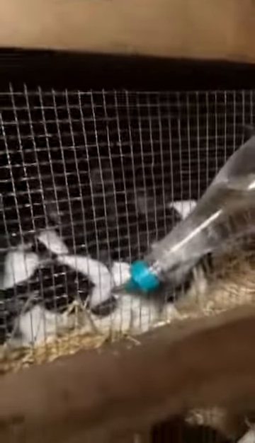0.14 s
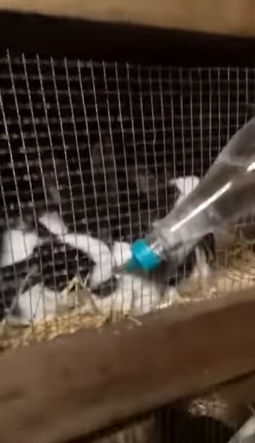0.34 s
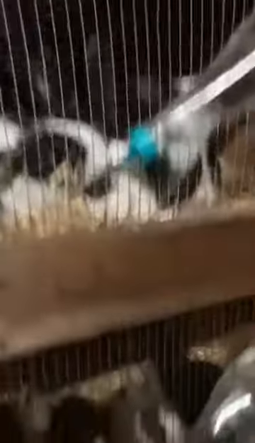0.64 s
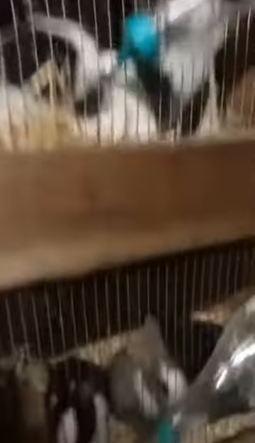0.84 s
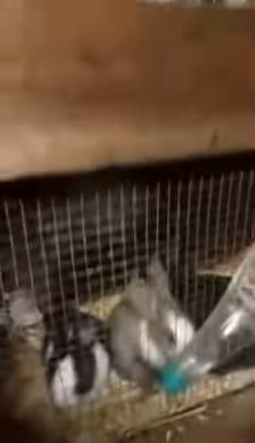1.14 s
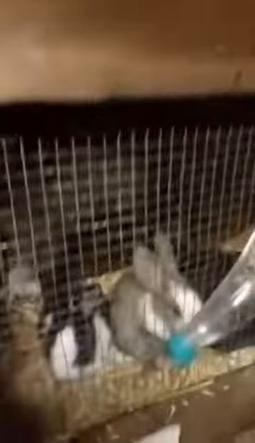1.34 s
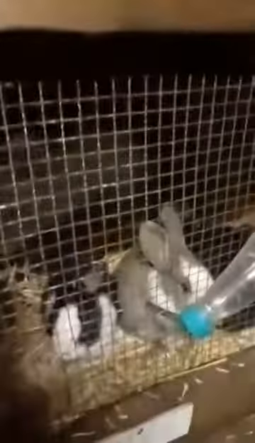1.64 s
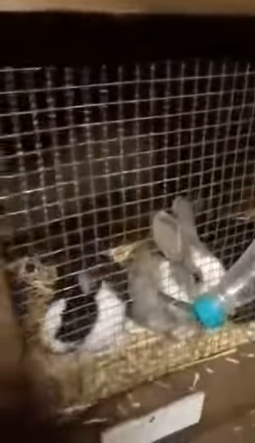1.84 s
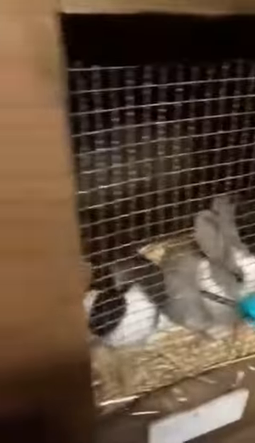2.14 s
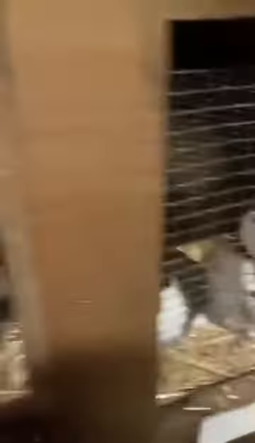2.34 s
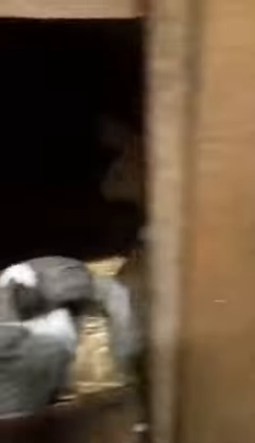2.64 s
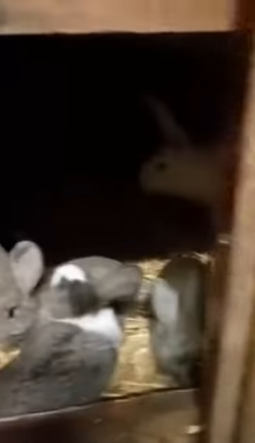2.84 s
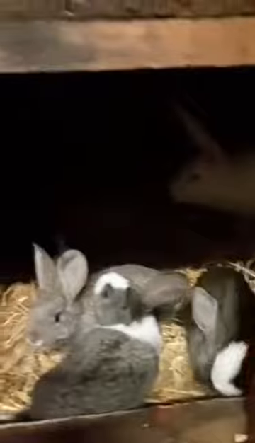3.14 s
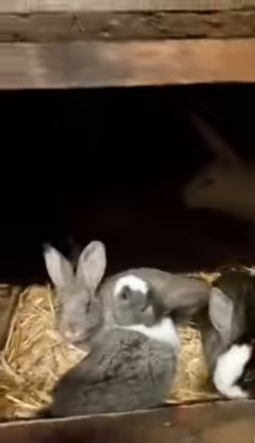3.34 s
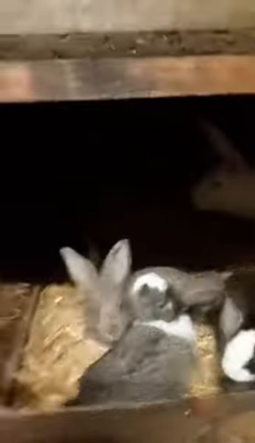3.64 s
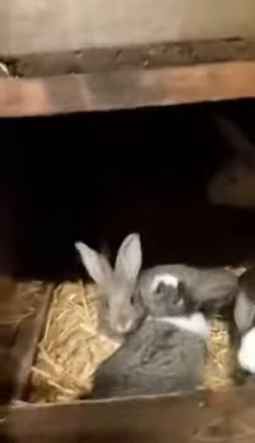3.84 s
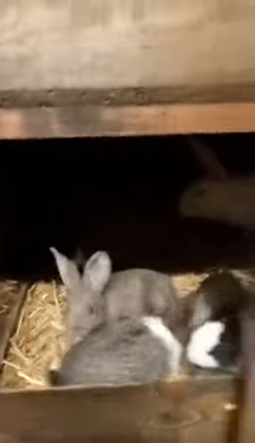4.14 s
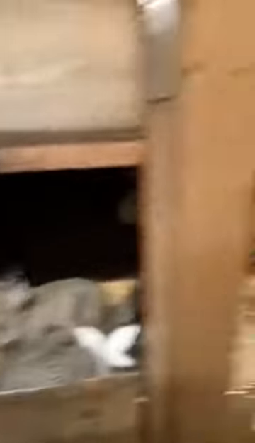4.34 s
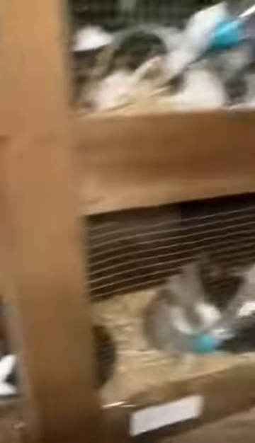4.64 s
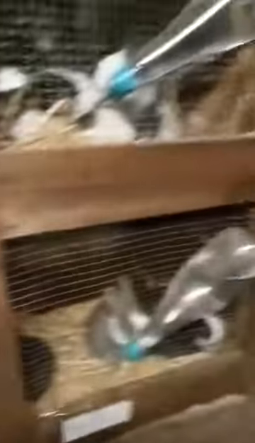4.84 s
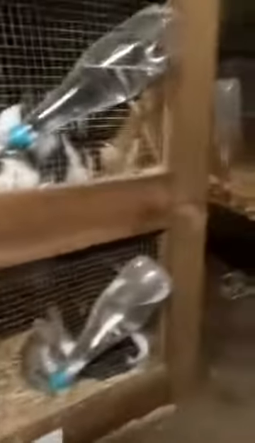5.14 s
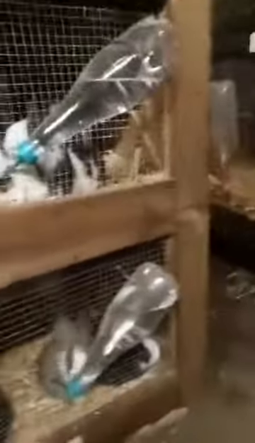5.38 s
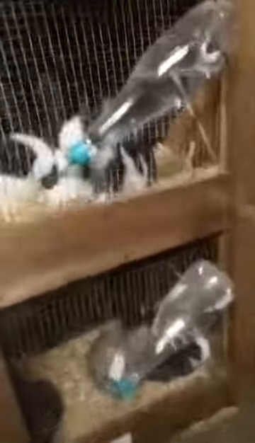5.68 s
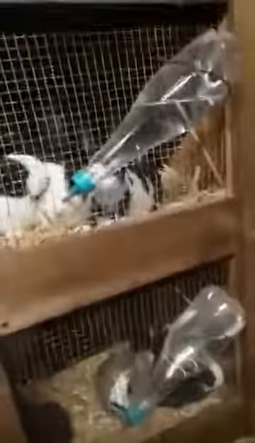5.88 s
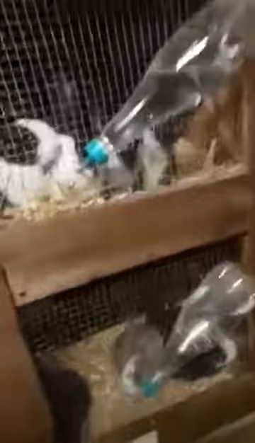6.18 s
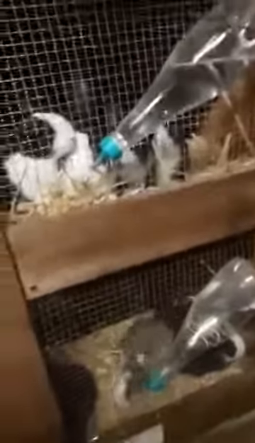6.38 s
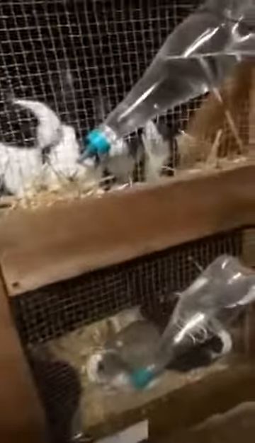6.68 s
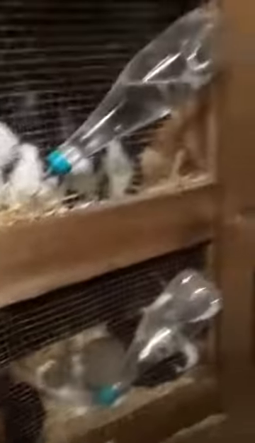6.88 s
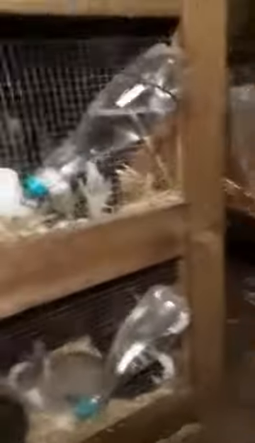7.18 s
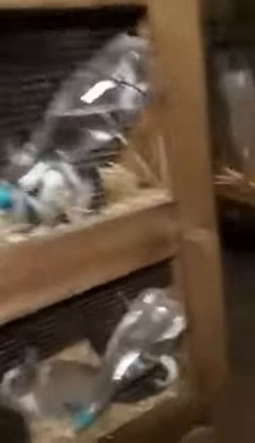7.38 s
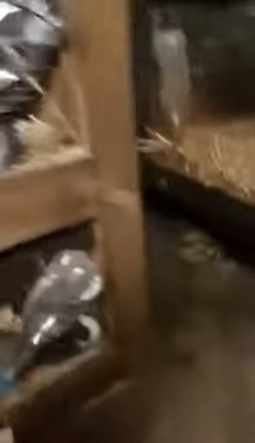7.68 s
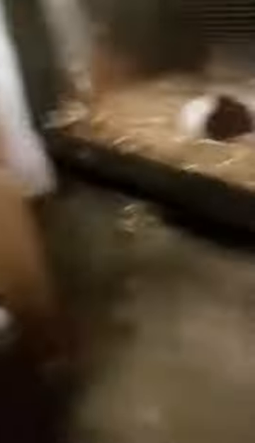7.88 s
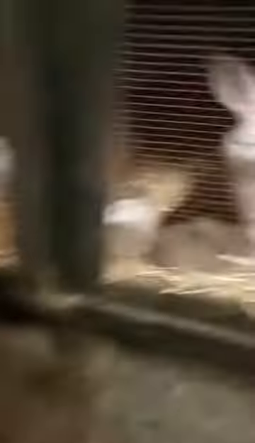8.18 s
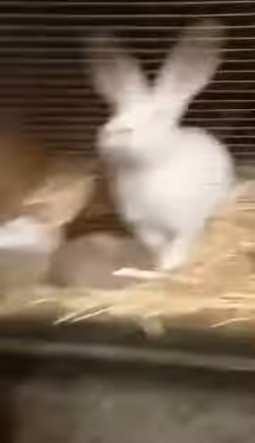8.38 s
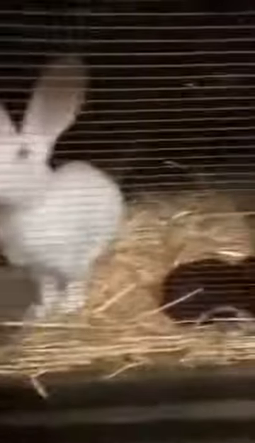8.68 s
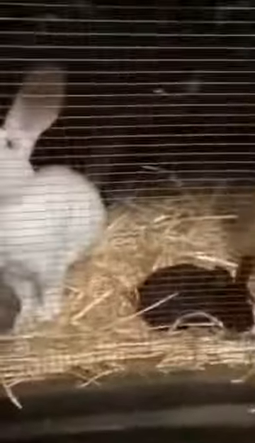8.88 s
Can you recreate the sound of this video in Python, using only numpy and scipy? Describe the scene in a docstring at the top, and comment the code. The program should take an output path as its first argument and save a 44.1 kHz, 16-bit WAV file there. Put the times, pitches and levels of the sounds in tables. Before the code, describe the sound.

Steady metallic lapping at drinker valves and soft straw rustles, broken midway by a burst of sharp hutch clacks and hollow floor thumps.

```python
"""Rabbits drinking in a shed

Rabbits lick and nibble at the ball valves of their bottles, about four times a second, and scrabble briefly:
noise bursts excite spout resonances. Straw hisses, crackles and swishes; scuffed boards resonate and glide.
Midway one bolts: blows excite the damped modes of the wooden frame, and feet those of the hollow floor.
Fingers tap the camera's case in short damped swings; faint whines and steady noise lie behind."""
import sys
import numpy as np
from scipy import signal
from scipy.fft import rfft, irfft
from scipy.io import wavfile
from scipy.ndimage import uniform_filter1d

SR = 44100
rng = np.random.default_rng(int(sys.argv[2]) if len(sys.argv) > 2 else 0)


def put_to_file(sound):
    """Save the sound as 16-bit audio at rate SR, in the file named by the first command-line argument."""
    columns = np.atleast_2d(sound).T  # one column per channel
    safe = np.clip(columns, -1, 1)
    whole_steps = np.round(safe * 32767)
    wavfile.write(sys.argv[1], SR, whole_steps.astype(np.int16))


N = 397782
TIME = np.arange(N) / SR

# Event levels are relative: most sources add a trim of their own; the whines use theirs directly.
# Wet licks and nibbles at the ball valves, and a few scrabbling bursts from 5.4 to 6.7 s:
# (time [s], peak level [dB], lead of the softer first burst [s], lag of the softer last burst [s])
LICKS_AND_SCRABBLES = [(0.001, -51, .04, 0.03), (0.202, -44, 0.045, 0.1), (0.465, -41.5, 0.083, 0.081),
                       (0.708, -42.5, 0.05, 0.064), (0.945, -42.5, 0.044, 0.024),
                       (1.025, -46, 0.013, 0.016), (1.195, -47, 0.04, 0.022), (1.341, -51.5, 0.033, 0.012),
                       (1.431, -41, 0.034, .108), (1.687, -40, 0.053, 0.046), (2.03, -42, 0.042, 0.12),
                       (2.278, -42.5, 0.035, 0.063), (2.543, -42, 0.045, 0.052), (2.787, -39, 0.047, 0.08),
                       (3.043, -44, 0.06, 0.073), (3.284, -42.5, 0.045, 0.028), (3.518, -39, 0.18, .121),
                       (3.756, -40, 0.034, 0.13), (3.984, -43, 0.049, 0.11), (4.232, -41, 0.038, 0.095),
                       (4.497, -42, .049, 0.067), (4.766, -39, 0.028, 0.073), (5.079, -42, 0.034, 0.018),
                       (5.421, -40, 0.052, .04), (6.174, -39, 0.014, .037), (6.441, -34.5, 0.075, .14),
                       (6.697, -39.5, 0.008, 0.14), (6.976, -42.5, 0.029, 0.081),
                       (7.228, -43.5, 0.061, 0.094), (7.48, -42, 0.047, 0.04), (7.805, -45, 0.035, 0.033),
                       (8.106, -39, 0.011, 0.032), (8.359, -42.5, .04, 0.11), (8.625, -43, 0.053, 0.15),
                       (8.815, -44, .04, .126)]
# Spectrum of bodies brushing on bedding and boards: (frequency [Hz], density [dB per Hz])
BRUSH_SPECTRUM = [(80, -3.5), (200, 4.5), (330, 1.5), (600, -2), (1000, -11.5), (2000, -12.5),
                  (5000, -42.5)]
# Bass roll-off of the microphone: (frequency [Hz], gain [dB])
BASS_ROLL_OFF = [(15, -62), (40, -19.5), (55, -11), (68, 1.5)]


def laps(level_db=-1, room_db=-3, grain_db=1, rise_s=0.0056, fade_s=0.0097, variety_db=3, uneven=0.8):
    """Source and resonator: a lick sets the steel ball chattering in its spout; scrabbles share the same bursts."""
    # Spectrum of the chatter: (frequency [Hz], density [dB per Hz])
    chatter_spectrum = [(180, -48), (300, -14), (715, -1.5), (940, 1), (1680, -6.5), (1880, -3.5),
                        (2170, -7.5), (3350, -1.5), (3870, -7.5), (5250, -28.5), (8780, -25.5),
                        (11000, -21), (12700, -21), (13300, -41.5), (14000, -87.5)]
    # Ringing of the steel spouts: (frequency [Hz], width [Hz], level [dB], pitch spread between bursts [share])
    spout_modes = [(1060, 123, -13.5, 0.064), (3510, 270, -11.5, 0.086), (11170, 800, -19, 0.008)]
    out, t = np.zeros(N), np.arange(SR // 8) / SR
    hz, db_per_hz = np.transpose(chatter_spectrum)
    for s, db in contacts():
        rise = rise_s * np.exp(uneven * rng.standard_normal())  # some bursts snap, others build up
        shape = np.minimum(t / rise, 1) * np.exp(-np.maximum(t - rise, 0) / fade_s)
        grain = np.repeat(rng.standard_normal(len(t)), 40)[:len(t)]  # steps of 40 samples
        chatter = rng.standard_normal(len(t)) * amp(grain_db * grain)
        varied = db_per_hz + variety_db * rng.standard_normal(len(hz))
        burst = unit(colour(chatter, np.c_[hz, varied]))
        for pitch, width, ring_db, spread in spout_modes:
            pitch = pitch * (1 + spread * rng.standard_normal())
            ringing = resonate(resonate(chatter, pitch, width), pitch, 2 * width)
            burst = burst + amp(ring_db) * unit(ringing)
        burst = burst * shape
        add(out, s, amp(db + level_db) * burst / peak_of(burst, size=300))
    return out + amp(room_db) * shed(out)  # far off, so the shed rings with it


def contacts(first_db=-6, last_db=-8.5):
    """Successive impacts: a lick touches the ball, pushes it in and lets it drop back; scrabbles get three bursts too."""
    hits = []
    for s, db, lead, lag in LICKS_AND_SCRABBLES:
        hits += [(s - lead, db + first_db), (s, db), (s + lag, db + last_db)]
    return [hit for hit in hits if hit[0] >= 0]


def clacks(level_db=-3, ring_db=-4, room_db=-13, low_db=12, high_db=18, spread=0.015, rise_s=0.0012):
    """Modal excitation: a short rattling burst drives the frame's modes; each event balances wood and wire its own way."""
    # Hard knocks on the hutch frame, and two faint ticks of licking at 5.08 and 7.48 s:
    # (time [s], peak level [dB], relative low-mid [dB], relative treble [dB], rattle time [s])
    knocks_and_ticks = [(4.7112, -37, 2.5, -24, 0.0068), (4.9594, -36.5, 2, -26, 0.0044),
                        (4.9657, -12.5, -19, -19, 0.002), (5.0802, -36.5, -24, -26, 0.003),
                        (5.27, -41, 8.5, -10, 0.012), (5.3068, -10, -11, -23.5, 0.0052),
                        (5.4008, -30.5, 7, -7, 0.0081), (5.4949, -19.5, -7.5, -30, 0.0027),
                        (5.5816, -18, 3.5, -9.5, 0.0032), (5.5933, -24, -1, -36, 0.0034),
                        (5.613, -20, -15, -7, 0.0018), (5.631, -18.5, -11, -14, 0.008),
                        (5.6656, -28, 0, -8, 0.005), (5.6843, -31.5, -2, -12, 0.0064),
                        (5.7433, -36.5, -2, -41, 0.003), (5.7826, -22.5, -12.5, -14, 0.0046),
                        (6.0635, -18, -10, -12.5, 0.0041), (6.2611, -42.5, 11.5, 3.5, 0.0078),
                        (6.3211, -36.5, 3.5, -22, 0.016), (6.4797, -20.5, -3.5, -6, 0.0026),
                        (6.7317, -9, -10, -12.5, 0.0033), (7.1602, -37, 4, -13, 0.0029),
                        (7.4787, -39, -25, -33, 0.0023)]
    # Modes of the frame: (frequency [Hz], level [dB], t60 [s])
    frame_modes = [(512, -15, 0.15), (625, -17, 0.14), (1084, -22.5, 0.11), (1252, -12, 0.072),
                   (2115, -5, 0.058), (2397, 5.5, 0.015), (2487, -0.5, 0.019), (2873, 0.5, 0.029),
                   (3250, -14, .02), (3280, -6, 0.063)]
    # Spectrum of the crack: (frequency [Hz], density [dB per Hz])
    crack_spectrum = [(150, -50), (500, -4.5), (900, -11.5), (1300, 1), (2300, 1), (3600, 2), (4200, -6.5),
                      (5000, -28.5), (6500, -23), (8500, -34), (13000, -33.5)]
    out, t = np.zeros(N), np.arange(SR // 5) / SR
    for s, db, low, high, rattle in knocks_and_ticks:
        burst = rng.standard_normal(len(t)) * (1 - np.exp(-t / rise_s)) * np.exp(-t / rattle)
        crack = colour(burst, crack_spectrum)
        # Every mode is detuned a little from event to event.
        frame = sum(ring([mode], t, 1 + spread * rng.standard_normal()) for mode in frame_modes)
        wood = signal.fftconvolve(burst, frame)[:len(t)]
        clack = crack / peak_of(crack) + amp(ring_db) * wood / peak_of(wood)
        balance = [(1200, low + low_db), (2350, 0.0049), (4600, 0), (6000, high + high_db)]
        add(out, s, amp(db + level_db) * colour(clack / peak_of(clack, size=200), balance))
    return colour(out + amp(room_db) * shed(out), BASS_ROLL_OFF, size=8192)


def thumps(level_db=-2, judder_db=-15, judder_s=0.024, room_db=-14, build_s=0.0032):
    """Soft impact on a plate: a padded foot excites the floor's low modes, and loose boards judder after it."""
    # Feet landing on the hollow floor:
    # (time [s], peak level [dB], contact time [s], pitch factor of the spot, ring time factor)
    landings = [(4.728, -34, 0.0084, 0.76, 0.41), (5.063, -31, 0.0023, 1.03, 0.67),
                (5.581, 1, 0.0023, 0.94, 0.69), (5.593, -8.5, 0.002, 0.92, 0.94),
                (5.699, -16.5, 0.0048, 0.98, 1), (5.827, -31, 0.0029, 0.93, 1),
                (6.065, -36, 0.0018, 0.92, 1), (6.483, -18, 0.00096, 0.74, 0.78),
                (6.506, -22.5, 0.0072, 1.04, 1), (6.731, -19, 0.0081, 1.08, 0.75),
                (6.856, -21.5, 0.004, 1.05, 0.71), (7.113, -32.5, 0.0052, 0.72, 1),
                (7.161, -13, 0.0048, 0.89, 0.81), (8.119, -32, 0.015, 0.95, 0.93),
                (8.53, -33, 0.0033, 0.84, 0.27)]
    # Modes of the floor before these factors: (frequency [Hz], level [dB], t60 [s])
    floor_modes = [(74.1, -13.5, 0.47), (117.8, -4.5, 0.32), (163.9, 2.5, 0.17), (190.8, -8, 0.33),
                   (246, -18.5, 0.4), (306, -7.5, 0.28), (355.4, -9.5, 0.25), (453, -11, 0.15),
                   (568, -8.5, 0.17), (702, -7, 0.28)]
    out, t = np.zeros(N), np.arange(SR) / SR
    for s, db, contact, pitch, hold in landings:
        push = t * np.exp(-4 * t / contact)
        modes = np.array(floor_modes) * [pitch, 1, hold]
        boom = signal.fftconvolve(ring(modes, t), push)[:len(t)]
        judder = unit(colour(rng.standard_normal(len(t)), BRUSH_SPECTRUM)) * np.exp(-t / judder_s)
        spreading = 1 - np.exp(-t / build_s)  # the whole floor takes a moment to move
        thump = boom / peak_of(boom, size=300) + amp(judder_db) * judder
        add(out, s, amp(db + level_db) * spreading * thump)
    return colour(out + amp(room_db) * shed(out), BASS_ROLL_OFF, size=8192)


def taps(level_db=-1, knock_db=1, click_db=5, cycles=0.42, lag_s=0.0012, click_s=0.00058,
         case_hz=1250, case_t60=0.00067, echo_db=-13):
    """Heavily damped oscillation: a tick, a brief knock and one swing of the case, reflected by the hutch fronts."""
    # Fingers on the camera's case: (time before the common lag [s], peak level [dB], pitch [Hz],
    # relative hardness of the touch [dB], brightness of its tick [dB])
    touches = [(3.395, -33, 320, -24, -8), (3.406, -27.5, 646, -8.5, -7), (3.445, -32.5, 328, -40, 0),
               (3.519, -34, 332, -20, -12), (3.591, -27.5, 332, -8, -6), (3.6081, -18.5, 350, -3.5, -10),
               (4.056, -40.5, 298, -32, -4), (4.737, -34, 273, -18, -6), (8.052, -20, 366, 1, -3.5),
               (8.133, -34, 245, -14, 16), (8.337, -24.5, 330, 5.5, -3), (8.435, -35, 280, -30, 0),
               (8.535, -37, 275, -23, -27), (8.756, -36.5, 456, -17, 12), (8.770, -35.5, 290, -10, 2),
               (8.88, -32.5, 290, -4, -29)]
    # Spectrum of the tick: (frequency [Hz], density [dB per Hz])
    tick_spectrum = [(300, -18), (900, 2), (2200, -8), (3500, -6), (5200, -30), (7000, -10), (9000, -27),
                     (11000, -13), (14000, -47)]
    out, t = np.zeros(N), np.arange(SR // 20) / SR
    for s, db, hz, hard, bright in touches:
        swing = np.sin(2 * np.pi * hz * t) * np.exp(-hz * t / cycles) * (1 - np.exp(-2 * hz * t))
        case = ring([(case_hz, hard + knock_db, case_t60)], t)
        scrape = 0.47 * rng.standard_normal(len(t)) * np.exp(-t / click_s)
        tick = colour((t == 0) + scrape, tick_spectrum)
        tick = colour(tick / peak_of(tick, size=44), [(4000, 0), (9000, bright)])  # nail is brighter than skin
        tap = swing / peak_of(swing) - 2 * case - amp(hard + click_db) * tick
        add(out, s + lag_s, amp(db + level_db) * tap)
    echoes = nearby(out, delay_s=0.0035, span_s=0.009)
    return colour(out + amp(echo_db) * echoes, BASS_ROLL_OFF, size=8192)


def straw(gain, level_db=4, flutter_db=2, swish_db=-7):
    """Friction noise: slow stirring of the bedding, with brighter swishes where a rabbit pushes through."""
    # Quick swishes through the straw: (time [s], peak level [dB], length [s])
    swishes = [(3.897, -43, 0.028), (4.228, -45.5, 0.077), (5.856, -36, 0.031), (5.934, -34, 0.091),
               (6.148, -39, 0.1), (6.349, -30.5, 0.057), (7.081, -40.5, 0.046), (7.112, -37.5, 0.073),
               (7.687, -45, 0.14), (8.09, -45, 0.11), (8.463, -36, 0.15), (8.959, -35.5, 0.075)]
    # Spectra of slow stirring and of swishes: (frequency [Hz], density [dB per Hz])
    stir_spectrum = [(200, -14), (600, 12), (1100, 13.5), (2200, 10.5), (3600, 17.5), (4900, 0.5),
                     (6800, 9), (9000, 0.5), (12500, 6), (14000, -39)]
    swish_spectrum = [(500, -3), (1500, 6.5), (3600, 12), (4900, -0.5), (6800, 6), (9000, 1.5),
                      (12500, 5.5), (14000, 1)]
    flutter = unit(uniform_filter1d(rng.standard_normal(N), 1200))
    pushing = np.zeros(N)
    for s, db, length in swishes:
        add(pushing, s, amp(db + swish_db) * np.hanning(int(length * SR)))
    stirred = stalks(stir_spectrum) * gain * amp(level_db + flutter_db * flutter)
    return stirred + stalks(swish_spectrum) * pushing


def stalks(points, crackle_db=-4, snaps_per_s=600, size_db=3, breaks_per_s=16, break_db=24, break_spread_db=3):
    """Random impulses in noise: stalks hiss and snap in tiny grains; now and then one breaks with a crisp tick."""
    sizes = amp(size_db * np.minimum(rng.exponential(1, N), 5))
    snaps = (rng.random(N) < snaps_per_s / SR) * rng.choice([-1, 1], N) * sizes
    breaks = (rng.random(N) < breaks_per_s / SR) * amp(break_db + break_spread_db * rng.standard_normal(N))
    hiss = rng.standard_normal(N)
    return unit(colour(hiss + amp(crackle_db) * unit(snaps) + breaks, points))


def stirring(attack_s=0.033, release_s=0.028, jostle_db=-26.5, jostle_s=0.085):
    """Addition of powers: bouts of straw, brushing and rumble swell, hold and die away over a resting level."""
    # Bouts of moving about: (start [s], length [s], straw level [dB], brushing level [dB], rumble level [dB])
    bouts = [(0.917, 0.72, -70, -63.5, -66.5), (2.0, 0.98, -76, -65, -64), (3.23, 0.86, -71.5, -57, -62.5),
             (4.177, 1.5, -68, -62, -66), (5.21, 0.3, -63.5, -58, -46.5),
             (5.598, 0.33, -60.5, -53.5, -40.5), (5.874, 0.6, -57, -48.5, -51),
             (6.494, 0.95, -65.5, -69, -60.5), (7.467, .42, -62, -61, -70), (8.037, 1.1, -53.5, -60.5, -67)]
    # While the rabbits sit still: (straw level [dB], brushing level [dB], rumble level [dB])
    rest_levels = (-76.5, -67, -71.5)
    power = amp(rest_levels)[:, None] ** 2 * np.ones(N)
    for start, length, *levels in bouts:
        swell = np.clip((TIME - start) / attack_s, 0, 1)
        release = np.exp(-np.maximum(TIME - start - length, 0) / release_s)
        power = power + (amp(levels)[:, None] * swell * release) ** 2
    for s, db, _, _ in LICKS_AND_SCRABBLES:  # each stroke or scrabble stirs the straw
        power[0] += amp(db + jostle_db) ** 2 * np.exp(-((TIME - s) / jostle_s) ** 2)
    return np.sqrt(power)


def shuffle(brush, rumble, brush_db=-2, rumble_db=-1):
    """Shaped noise under an envelope: shifting weight brushes the bedding and rumbles in the boards."""
    # Spectrum of the boards: (frequency [Hz], density [dB per Hz])
    rumble_spectrum = [(20, -28), (45, -21), (62, -5), (72, 8.5), (86, 3), (115, 3.5), (170, -5.5),
                       (300, -10.5), (800, -65)]
    brushing = unit(colour(rng.standard_normal(N), BRUSH_SPECTRUM)) * brush * amp(brush_db)
    boards = unit(colour(rng.standard_normal(N), rumble_spectrum, size=8192)) * rumble * amp(rumble_db)
    return brushing + boards


def scuffs(level_db=-5, width_hz=55, sag=0.16, upper=2.04, upper_db=-5, rub_db=-7):
    """Friction-driven resonance: fur and feet rub a board, whose two resonances sag as the weight shifts."""
    # Bodies scuffing along the boards: (time [s], level [dB], length [s], mid-glide resonance [Hz])
    rubs = [(0.992, -47, 0.068, 400), (1.296, -44.5, 0.1, 356), (1.622, -43, 0.084, 354),
            (1.704, -45, 0.088, 482), (1.968, -48.5, 0.096, 370), (2.05, -47.5, 0.1, 400),
            (2.581, -47, 0.093, 305), (2.712, -47, 0.15, 368), (2.822, -44, 0.1, 320),
            (3.772, -39, 0.092, 310), (3.88, -43, 0.081, 332), (6.209, -32.5, 0.031, 495),
            (6.714, -31.5, 0.026, 576), (7.158, -29.5, 0.026, 537)]
    out = np.zeros(N)
    for s, db, length, hz in rubs:
        u = np.linspace(0, 1, int(length * SR))
        rub = colour(rng.standard_normal(SR)[:len(u)], BRUSH_SPECTRUM)
        glide = hz * (1 + sag * (0.5 - u))
        lower_tone = unit(resonate(rub, glide, width_hz))
        upper_tone = unit(resonate(np.gradient(rub), upper * glide, width_hz))
        scuff = unit(lower_tone + amp(upper_db) * upper_tone + amp(rub_db) * unit(rub))
        add(out, s, amp(db + level_db) * scuff * np.sin(np.pi * u))
    return out


def whines(width_hz=110, waver=0.031, flicker_db=3):
    """Narrow-band noise: faint breathy tones that glide, waver and flicker."""
    # Thin whines that come and go: (time [s], length [s], level [dB], start [Hz], end [Hz])
    glides = [(0.296, 0.02, -59, 5850, 5800), (1.757, 0.15, -64, 1420, 1360), (4.82, 0.16, -59, 1530, 1450),
              (7.195, 0.13, -51.5, 1590, 1500), (7.292, 0.24, -56.5, 1590, 1360),
              (8.15, 0.12, -60, 1380, 1440)]
    out = np.zeros(N)
    for s, length, db, start, end in glides:
        size = int(length * SR)
        drift, flicker = uniform_filter1d(rng.standard_normal((2, SR)), 900)[:, :size]
        hz = np.linspace(start, end, size) * (1 + waver * unit(drift))
        breath = rng.standard_normal(SR)[:size]
        tone = resonate(resonate(breath, hz, width_hz), hz, 2 * width_hz)
        tone = unit(tone * amp(flicker_db * unit(flicker)))
        add(out, s, amp(db) * tone * signal.windows.tukey(size, 0.6))
    return out


def air(level_db=-64):
    """Stationary coloured noise: the still background of the shed."""
    # Spectrum of the background: (frequency [Hz], density [dB per Hz])
    air_spectrum = [(15, -45.5), (25, 1), (147, 6), (1360, 9.5), (1600, 6.5), (2140, 4.5), (2380, 7.5),
                    (5260, -13.5), (6500, -25.5), (10700, -58), (11900, -27.5), (14000, -8)]
    return amp(level_db) * unit(colour(rng.standard_normal(N), air_spectrum, size=8192))


def shed(x):
    """Exponential reverberation: three sparse tails take turns, the treble dying first."""
    # Reverberation time of the shed: (frequency [Hz], t60 [s])
    decay_times = [(100, 0.44), (500, 0.3), (1100, 0.2), (3000, 0.15), (7000, 0.1), (13000, 0.12)]
    out = np.zeros(N)
    for k in range(3):
        echoes = rng.choice([-1., 1.], SR // 2) * (rng.random(SR // 2) < 0.15)
        hz, t, z = signal.stft(echoes, SR, nperseg=256)
        decay = np.exp(-np.log(1000) * t / read(decay_times, hz)[:, None])
        tail = signal.istft(z * decay, SR, nperseg=256)[1]
        tail *= np.minimum(np.arange(len(tail)) / SR / 0.014, 1)  # builds up over 14 ms
        turn = np.cos(np.pi * (TIME + k / 3)) * np.sqrt(2 / 3)  # the three powers sum to 1
        out += signal.oaconvolve(x * turn, tail / np.linalg.norm(tail))[:N]
    return out


def nearby(x, delay_s, span_s):
    """Early reflections: a short cluster of dull echoes from the hutch fronts."""
    # Spectrum of the hutch fronts near the camera: (frequency [Hz], gain [dB])
    echo_spectrum = [(150, -13), (500, -1), (1000, -2), (3000, -6), (6000, -18)]
    t = np.arange(SR // 20) / SR - delay_s
    cluster = colour(rng.standard_normal(len(t)) * (t > 0) * np.exp(-abs(t) / span_s), echo_spectrum)
    band = abs(rfft(cluster, SR)[300:1200])  # one bin per Hz
    return signal.oaconvolve(x, cluster / np.sqrt(np.mean(band ** 2)))[:N]


def ring(modes, t, pitch=1):
    """Modal superposition: damped sines after one blow."""
    return sum(amp(db) * np.exp(-np.log(1000) * t / t60) * np.sin(2 * np.pi * hz * pitch * t)
               for hz, db, t60 in modes)


def resonate(x, hz, width):
    """Heterodyne resonator: shifts the curve hz to zero, smooths with unit gain and shifts back."""
    turn = np.exp(2j * np.pi * np.cumsum(hz * np.ones(len(x))) / SR)
    r = np.exp(-np.pi * width / SR)
    return 2 * (turn * signal.lfilter([1 - r], [1, -r], x / turn)).real


def colour(x, points, size=2048):
    """Minimum-phase filtering: the log gain fixes the phase of a causal filter."""
    log_gain = np.log(amp(read(points, abs(np.fft.fftfreq(size, 1 / SR)))))
    response = np.fft.ifft(np.exp(np.conj(signal.hilbert(log_gain)))).real
    return signal.oaconvolve(x, response[:size // 2])[:len(x)]


def read(points, hz):
    """Interpolation on a log-frequency axis."""
    f, value = np.transpose(points)
    return np.interp(np.log(hz + 1), np.log(f), value)


def amp(db):
    """Logarithmic level: decibels to amplitude gain."""
    return 10 ** (np.asarray(db) / 20)


def unit(x):
    """Power normalisation: scales to rms 1."""
    return x / np.sqrt(np.mean(x ** 2) + 1e-20)


def peak_of(x, size=88):
    """Running power average: the highest short-time rms over size samples."""
    return np.sqrt(uniform_filter1d(x ** 2, size).max())


def add(mix, s, sound):
    """Superposition: lays a sound into the mix at s seconds."""
    part = mix[max(round(s * SR), 0):][:len(sound)]
    part += sound[:len(part)]


def scene(knock_side_db=-5):
    """Mid-side stereo: independent draws of some sources form a side signal, chiefly in the treble."""
    # Side signal against frequency: (frequency [Hz], amplitude share)
    side_share = [(3500, 0.0017), (4500, 0.05), (5500, 0.23), (7000, 0.38), (10000, 0.4), (13000, 0.13)]
    rustle, brush, rumble = stirring()
    mid = laps() + clacks() + thumps() + taps() + straw(rustle)
    mid = mid + shuffle(brush, rumble) + scuffs() + whines() + air()
    scattered = laps() + straw(rustle) + air() + amp(knock_side_db) * clacks()
    side = irfft(rfft(scattered) * read(side_share, np.fft.rfftfreq(N, 1 / SR)), N)
    return np.array([mid + side, mid - side])


def record(dry, ceiling=0.92, edge_hz=13400):
    """Saturation and band limit: the loudest peaks round off below the ceiling, then a low-pass follows."""
    held = dry / (1 + (dry / ceiling) ** 6) ** (1 / 6)
    low_pass = signal.firwin(255, edge_hz, window=("kaiser", 8), fs=SR)
    return signal.oaconvolve(held, low_pass[None], "same")


dry = scene()
out = record(dry)
put_to_file(out)
```